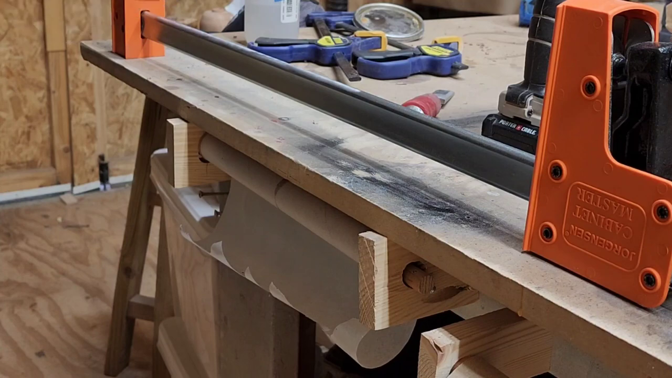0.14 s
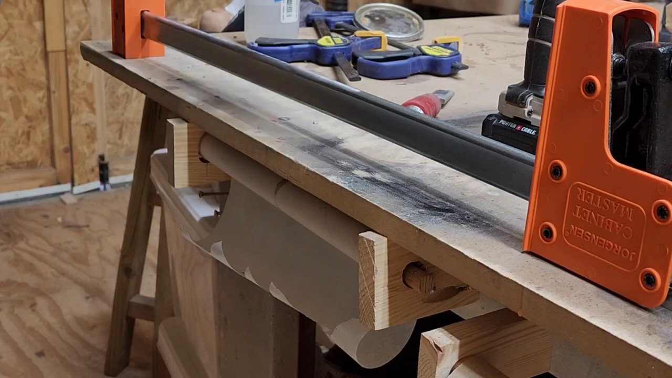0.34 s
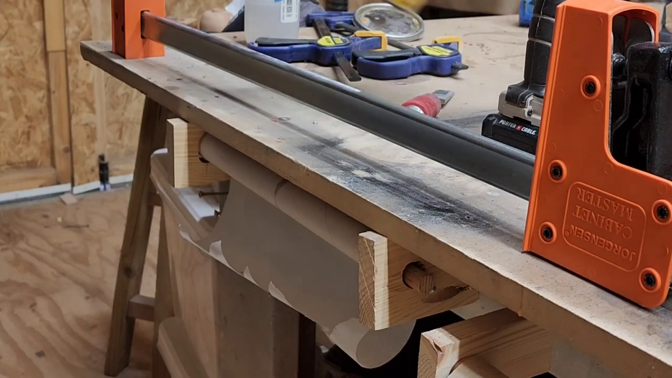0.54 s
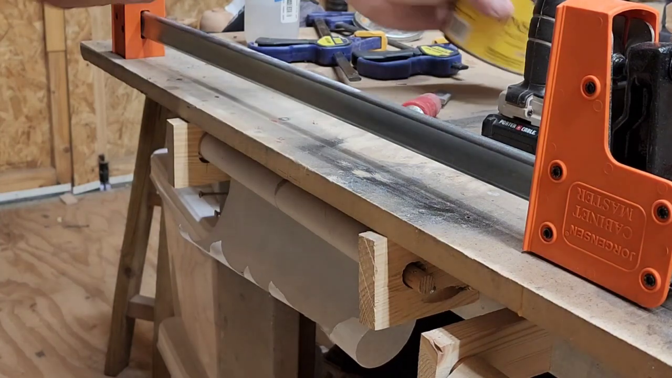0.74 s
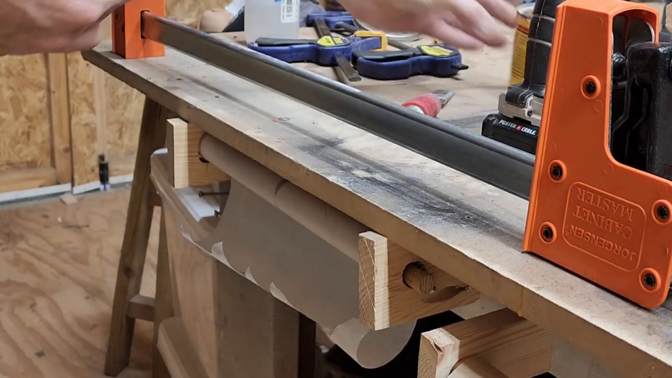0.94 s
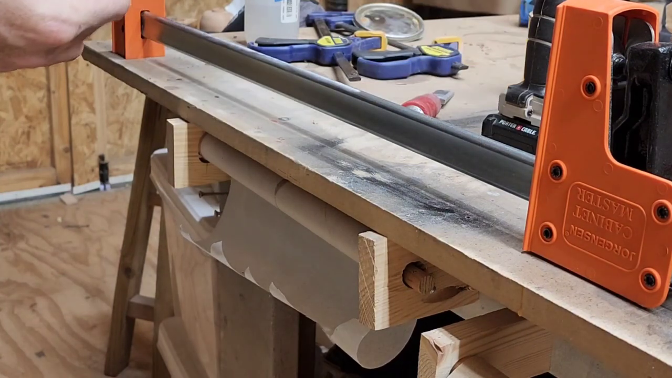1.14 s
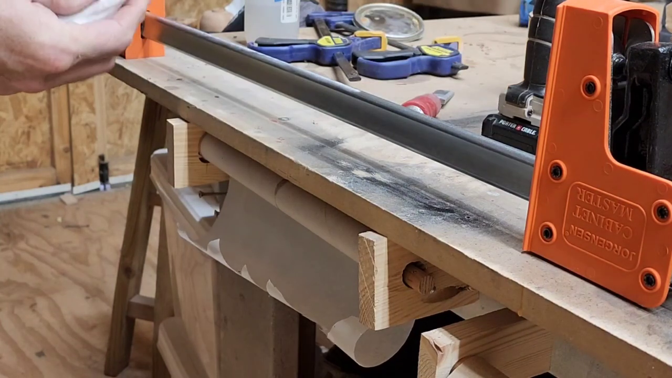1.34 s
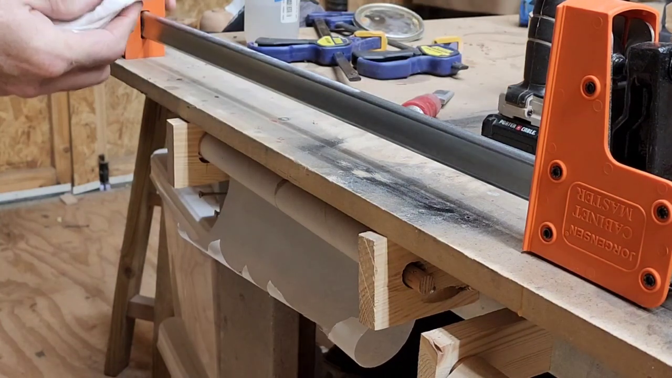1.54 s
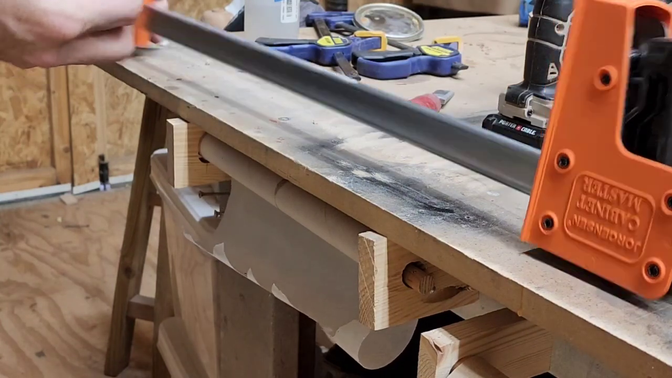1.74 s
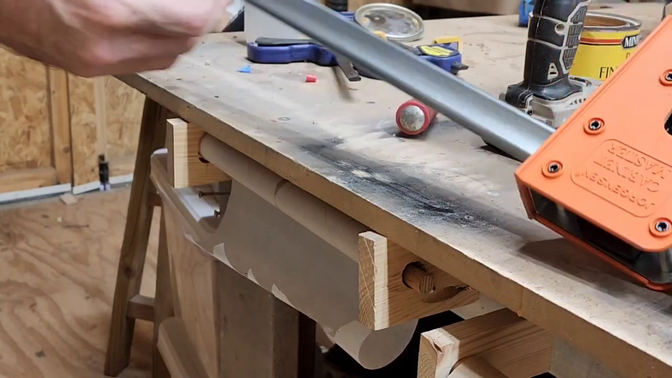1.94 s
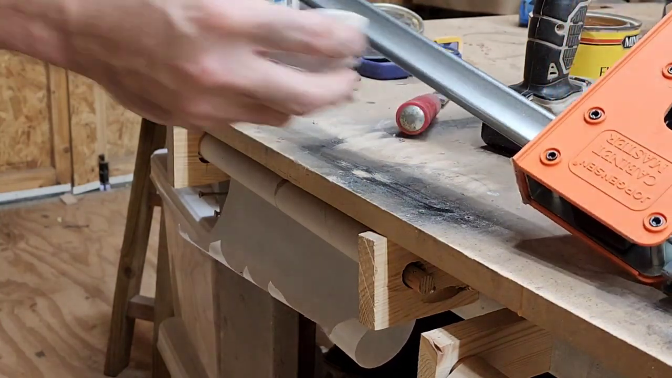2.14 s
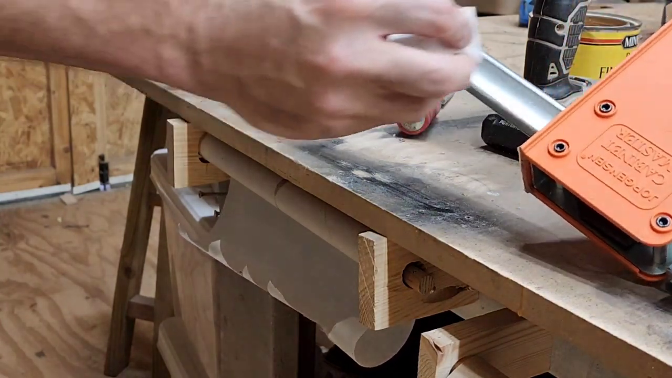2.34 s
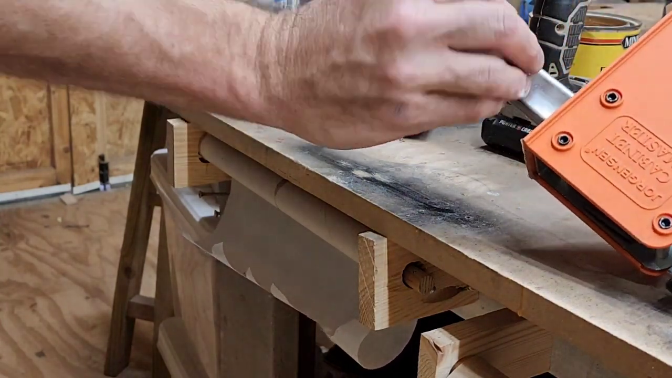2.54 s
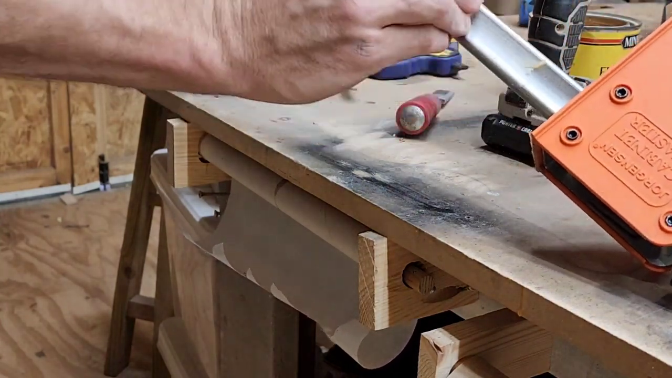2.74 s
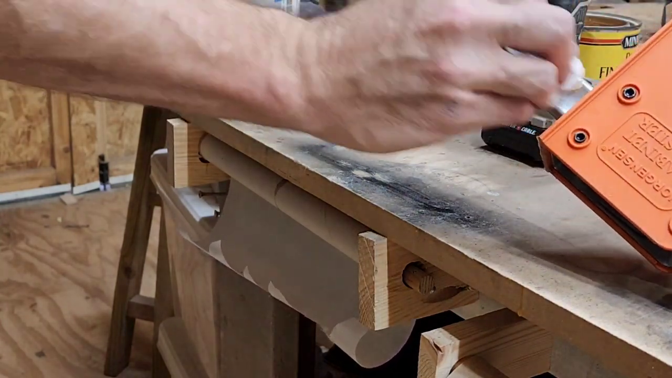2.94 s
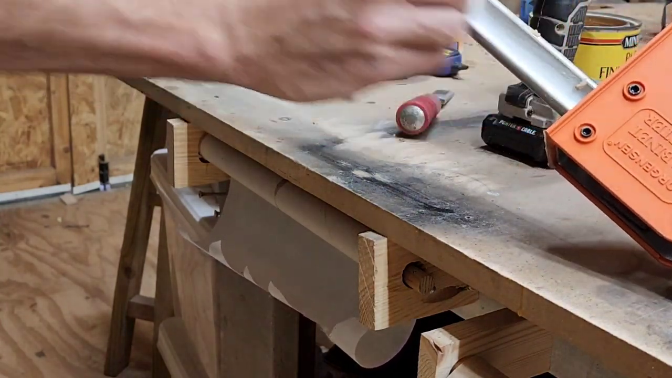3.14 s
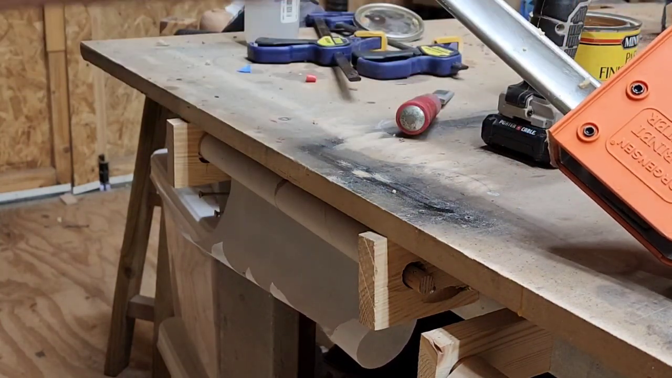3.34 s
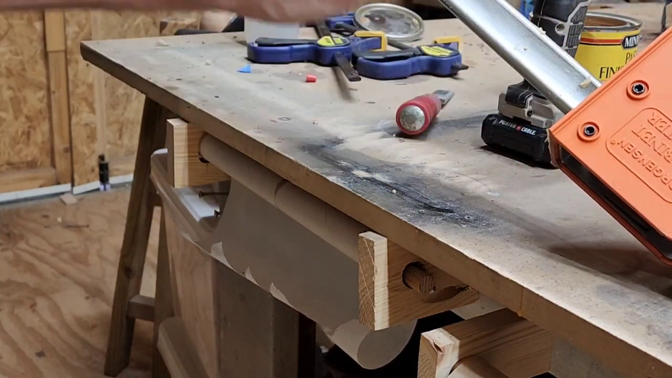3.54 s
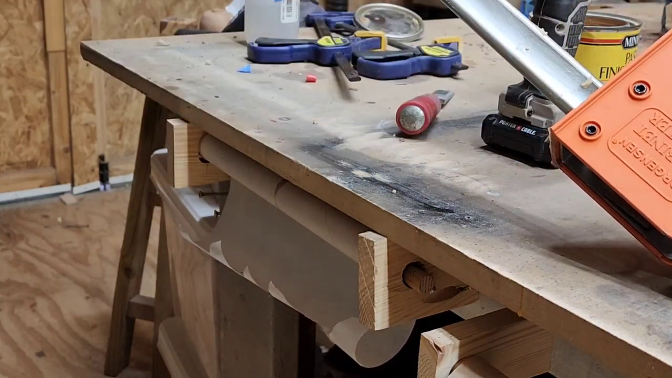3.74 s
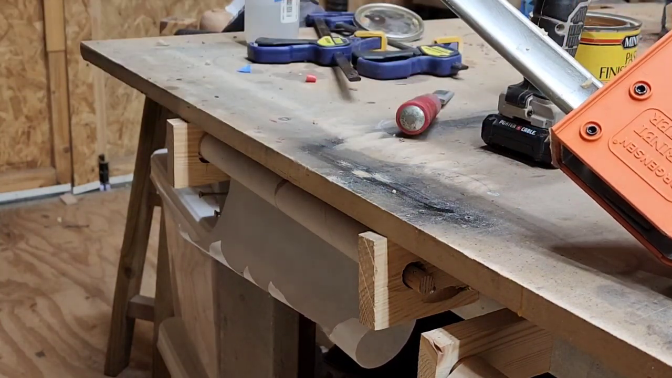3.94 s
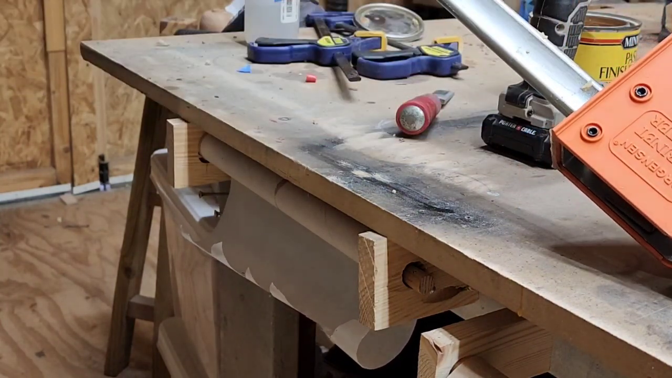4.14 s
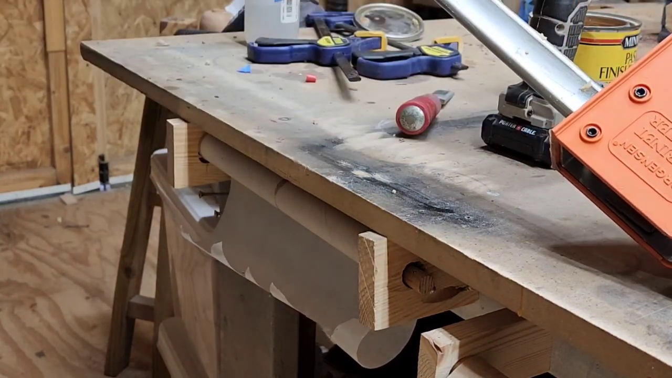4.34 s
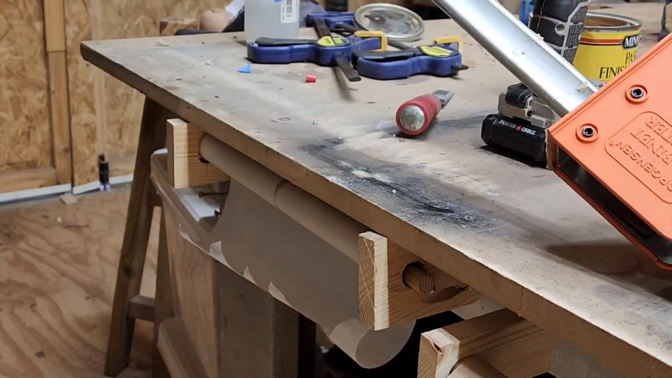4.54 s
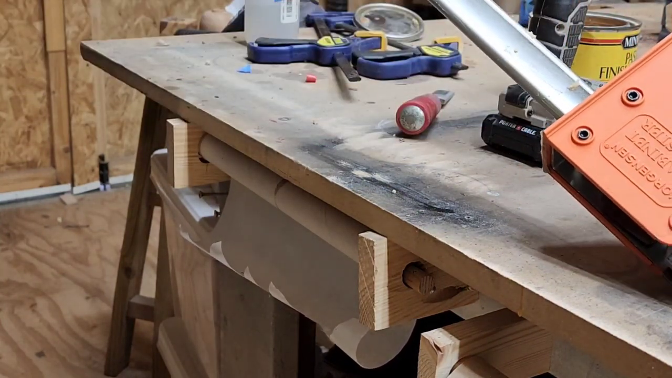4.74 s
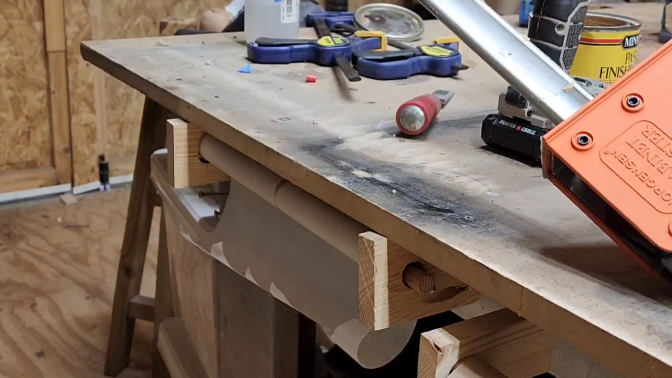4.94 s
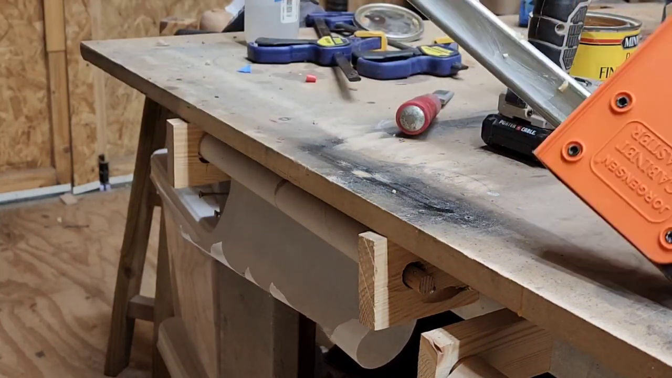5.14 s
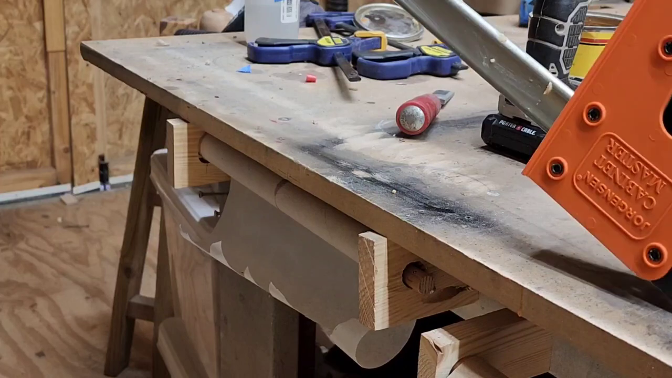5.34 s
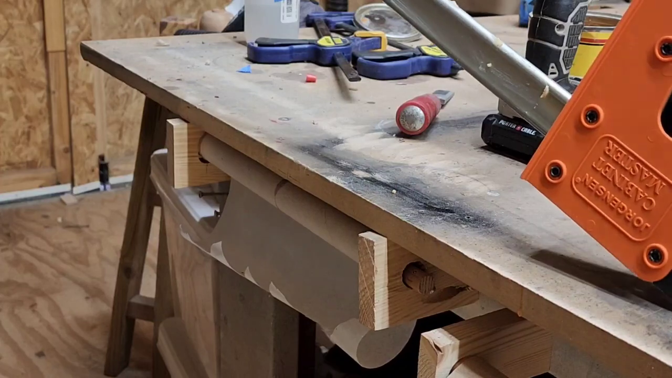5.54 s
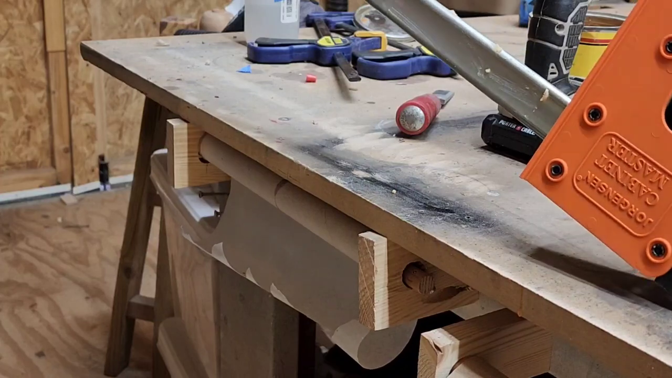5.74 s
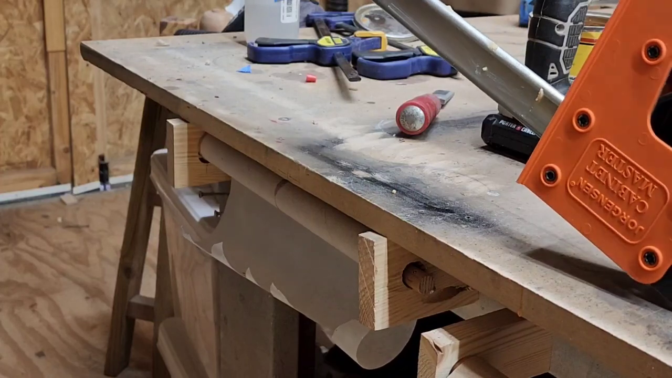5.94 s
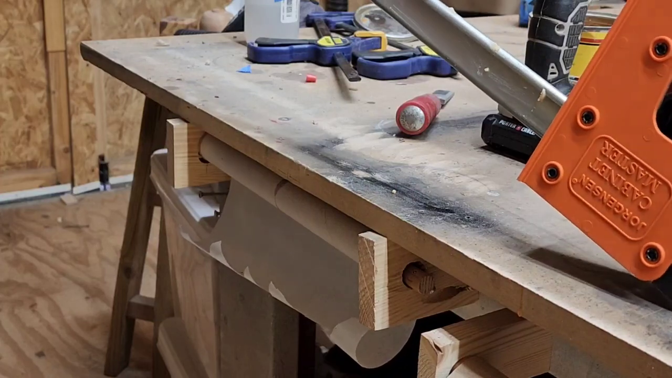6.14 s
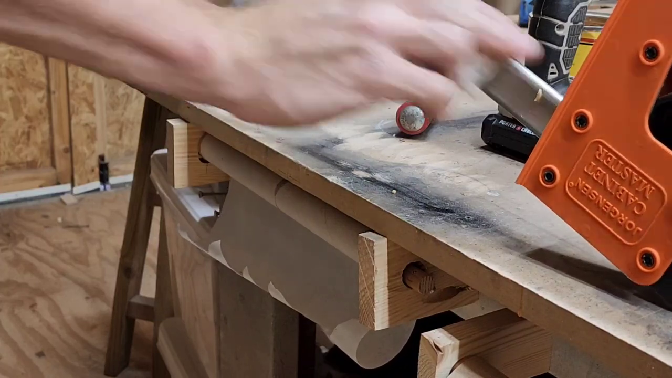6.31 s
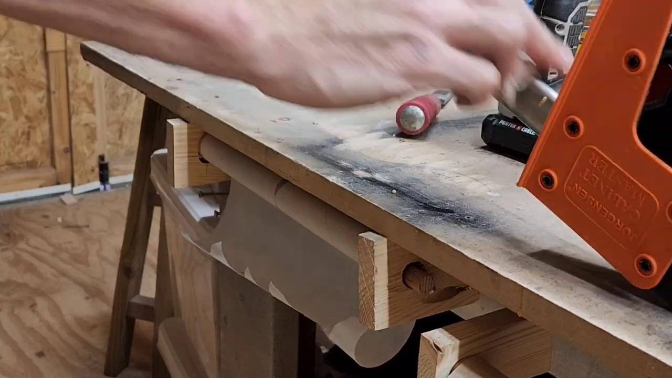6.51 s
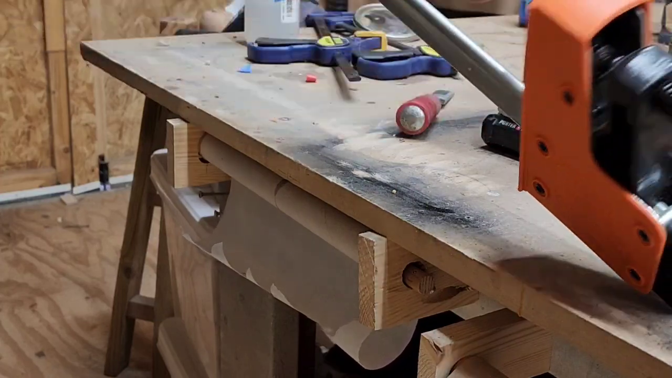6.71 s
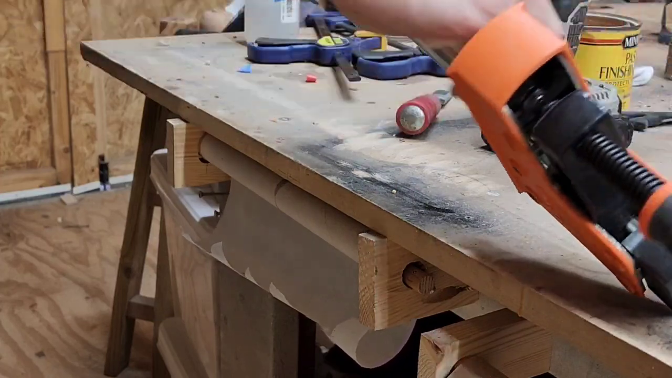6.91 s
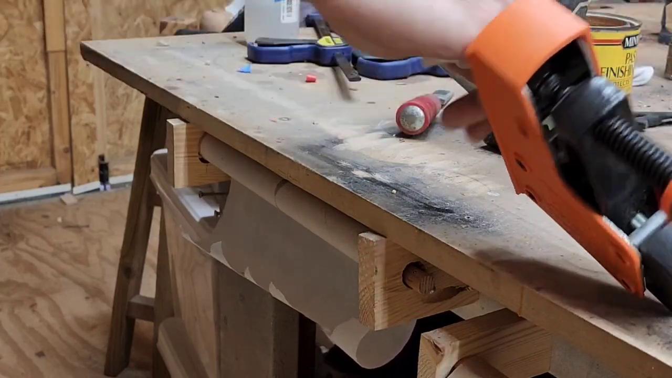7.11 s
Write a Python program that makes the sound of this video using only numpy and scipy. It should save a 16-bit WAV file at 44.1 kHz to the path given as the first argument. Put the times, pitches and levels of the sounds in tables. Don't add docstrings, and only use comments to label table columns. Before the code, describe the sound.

A tin knocks down twice on a wooden bench, a clamp's plastic jaw chatters down its steel bar, then a rag wipes it amid small clacks.

```python
import sys
import numpy as np
from scipy import signal
from scipy.fft import rfft, irfft, next_fast_len
from scipy.io import wavfile
from scipy.ndimage import uniform_filter1d

SR = 44100
rng = np.random.default_rng(int(sys.argv[2]) if len(sys.argv) > 2 else 0)


def transcribe(signal):
    frames = np.atleast_2d(signal).T
    limited = np.clip(frames, -1, 1)
    pcm = np.round(limited * 32767).astype(np.int16)
    wavfile.write(sys.argv[1], SR, pcm)


def makeup_ratio(level_db):
    decades = np.asarray(level_db, float) / 20
    return 10 ** decades


N = 320607
SIZE = next_fast_len(N + SR)
HZ = np.maximum(np.fft.rfftfreq(SIZE, 1 / SR), 1)
T_S = np.arange(N) / SR
OPPOSITE = np.array([[1], [-1]])


def rms_one(x):
    return x / np.sqrt(np.mean(x ** 2) + 1e-20)


def in_time(rows):
    s, *columns = np.transpose(rows)
    return [np.interp(T_S, s, c) for c in columns]


def at_hz(points, hz):
    f, value = np.array(points).T
    return np.interp(np.log(hz), np.log(f), value)


def drift(rate_hz):
    knots = rng.standard_normal(int(N / SR * 200))
    return np.interp(T_S * rate_hz, np.arange(len(knots)), knots)


def swells(rows):
    return sum(makeup_ratio(db) * np.exp(-((T_S - s) / width_s) ** 2) for s, db, width_s in rows)


# f/Hz, correlation
LIKENESS = [(25, 0.43), (60, 1), (130, 0.95), (290, 0.9), (640, 1), (1410, 0.31), (3100, 0.33),
            (6820, -0.12), (15000, 0.0036)]


def noise(gain):
    mid, side = rfft(rng.standard_normal((2, SIZE)))
    alike = np.clip(at_hz(LIKENESS, HZ), -.99, .99)
    both = np.sqrt(1 + alike) * mid + np.sqrt(1 - alike) * side * OPPOSITE
    return rms_one(irfft(gain * both, SIZE)[:, :N])


def peak(hz, width_hz):
    return 1 / np.hypot(1, 2 * (HZ - hz) / width_hz)


def ring(hz, t60, soft_s, size=9000, order=1):
    t = np.arange(size) / SR
    return np.sin(2 * np.pi * hz * t) * makeup_ratio(-60 * t / t60) * (1 - np.exp(-t / soft_s)) ** order


def burst(white, low_hz, high_hz, rise_s, t60):
    band = signal.butter(1, [low_hz, min(high_hz, .45 * SR)], "band", fs=SR, output="sos")
    t = np.arange(white.shape[-1]) / SR
    grains = rms_one(signal.sosfilt(band, signal.sosfilt(band, white)))
    return grains * (1 - np.exp(-t / rise_s)) * makeup_ratio(-60 * t / t60)


def add(out, s, sound):
    i = round(s * SR)
    out[..., i:i + sound.shape[-1]] += sound[..., :N - i]


def thump(db, modes):
    return sum(makeup_ratio(db + level_db) * ring(hz, t60, 0.0032, size=22000, order=2) for hz, level_db, t60 in modes)


# f/Hz, density/dB
AIR = [(13, -43), (22, -47), (44, -3.5), (75, -14.5), (110, -1), (179, -19), (203, -20.5), (229, -10),
       (265, -22.5), (411, -15), (565, -24), (943, -19), (1120, -24.5), (2160, -27), (7500, -43),
       (9750, -104), (16500, -120)]
# f/Hz, width/Hz, level/dB
AIR_PEAKS = [(57.3, 28, -57), (171.5, 10.6, -60), (400, 120, -63.5), (1000, 43, -64.5), (1500, 140, -65),
             (2200, 170, -69)]
# f/Hz, rms/dB
HUM = [(120.0, -50), (240.0, -65)]
# t/s, level/dB
NUDGES = [(0.273, -32.5), (0.723, -38), (1.6, -61), (2.401, -29), (2.549, -46), (2.981, -50), (3.199, -36),
          (3.42, -60), (3.547, -32.5), (3.852, -59), (4.148, -31.5), (4.36, -33), (4.498, -51),
          (6.617, -32)]
AIR_DB, BENCH_HUM_DB, NUDGE_SWELL_S = -48, -59.5, 0.059
HUM_LAG_S = 15 / 44100


def shop():
    swell_db = .6 * drift(6)
    out = makeup_ratio(AIR_DB + swell_db) * noise(makeup_ratio(at_hz(AIR, HZ)))
    out = out + sum(makeup_ratio(db) * noise(peak(hz, width_hz) ** 2) for hz, width_hz, db in AIR_PEAKS)
    out = out + makeup_ratio(BENCH_HUM_DB) * noise(peak(100.8, 3.0) ** 2)
    out[0] = np.roll(out[0], round(HUM_LAG_S * SR))
    lowest_hz, _, lowest_t60 = BENCH[0]
    for s, db in NUDGES:
        add(out, s, makeup_ratio(db + 3.5) * ring(lowest_hz, lowest_t60, NUDGE_SWELL_S, size=22000))
    t = T_S - np.array([[HUM_LAG_S], [0]])
    return out + sum(makeup_ratio(db) * np.sqrt(2) * np.sin(2 * np.pi * hz * t) for hz, db in HUM)


# start t/s, peak level/dB, place of top speed/0-1, peakedness/1, lower band/dB
STROKES = [(2.68, -64, 0.77, 3, 1.5), (2.92, -63.5, 0.32, 1.5, 2.5), (3.095, -56.5, 0.64, 1.4, 4),
           (3.265, -64.5, 0.15, 1.7, 0.5), (3.40, -56.5, 0.44, 1.2, 4.5), (3.582, -58.5, 0.32, 0.51, 3.5),
           (3.70, -53.5, 0.7, 0.75, 1), (3.875, -54, 0.34, 1.1, 0.5), (3.99, -58, 0.3, 0.75, 0),
           (4.19, -59, 0.52, 1.2, 1.5), (4.345, -57, 0.34, 1.1, 1.5), (4.515, -64.5, 0.4, 1, 1.5),
           (4.655, -65.5, .5, 0.64, 2), (4.805, -65.5, 0.5, 0.67, 1), (4.945, -66.5, 1, 0.25, 4.5),
           (5.06, -65, 0.76, 0.58, 4.5), (5.35, -62.5, 0.58, 0.83, 2.5), (5.51, -63.5, 0.2, 1, 4),
           (5.645, -56, 0.61, 0.62, 2), (6.04, -52.5, 0.55, 1.3, -1), (6.26, -56.5, 0.24, .9, -1),
           (6.61, -80, 0, 6, 4.5), (6.98, -68.5, 0.4, 0.68, 2.5), (7.19, -63, 1, 1.8, 9.5)]
# t/s, level/dB, half width/s
SLEEVES = [
    (0, -82, 0.096),
    (.27, -80.5, 0.046),
    (.93, -88, .04),
    (1.01, -56, 0.01),
    (1.055, -66.5, 0.018),
    (1.08, -73, 0.12),
    (1.66, -93, 0.042),
    (1.78, -72, 0.11),
    (2.39, -74.5, 0.033),
]
LAST_TURN_S, CLOTH_REST_DB = 7.36, -84.5
TURN_BLUR_S = 0.0025
LOW_FOLLOWS, LOW_MATCH_DB = 0.78, -51.5


def strokes():
    level, low_db = np.zeros(N), np.zeros(N)
    ends = [row[0] for row in STROKES[1:]] + [LAST_TURN_S]
    for (s, db, top, power, band_db), end in zip(STROKES, ends):
        now = slice(round(s * SR), round(end * SR))
        top_s = s + np.clip(top, .1, .9) * (end - s)
        phase = np.interp(T_S[now], [s, top_s, end], [0, np.pi / 2, np.pi])
        level[now] = makeup_ratio(db) * np.abs(np.sin(phase)) ** max(power, .2)
        low_db[now] = band_db
    level = uniform_filter1d(level, size=round(TURN_BLUR_S * SR))
    level_db = 20 * np.log10(level + makeup_ratio(CLOTH_REST_DB) + swells(SLEEVES))
    return level_db, uniform_filter1d(low_db, size=1000) + (LOW_FOLLOWS - 1) * (level_db - LOW_MATCH_DB)


# f/Hz, density/dB
WIPE_LOW = [(1500, -6), (3000, -9.5), (4500, -9.5), (6000, -5), (7500, -1), (9000, -5.5), (10500, -6),
            (12000, -3.5)]
# f/Hz, density/dB
WIPE_HIGH = [(7000, -23), (9000, -27), (11000, -2), (13000, 4.5), (14500, 1.5), (15700, -3), (16300, 7)]
# t/s, peak level/dB
TICKS = [
    (0.2907, -56),
    (0.8215, -55),
]
QUIET_TOP_HZ = 15740


def rag():
    level_db, low_db = strokes()
    high = makeup_ratio(0.62 * drift(52)) * noise(makeup_ratio(at_hz(WIPE_HIGH, HZ)) * (HZ < QUIET_TOP_HZ))
    low = makeup_ratio(low_db - 1.0 + drift(34)) * noise(makeup_ratio(at_hz(WIPE_LOW, HZ))) * makeup_ratio(2.5 * OPPOSITE)
    out = makeup_ratio(level_db + 5.0) * (high + low)
    for s, db in TICKS:
        add(out, s, makeup_ratio(db) * (ring(14000, .012, .0002) + ring(15000, .012, .0002)))
    return out


def strike(modes, luck, spread_db, apart_db, soft_s):
    out = 0
    for (hz, db, t60), (a, b) in zip(modes, luck):
        apart = b * min(hz / 1500, 1)
        out = out + makeup_ratio(db + spread_db * a + apart_db * apart * OPPOSITE) * ring(hz, t60, soft_s)
    return out


# t/s, peak level/dB, contact brightness f/Hz, rattle/dB, bench thump/dB
TIN_HITS = [(1.0015, -13, 2000, -5.5, -28), (1.0062, -2.5, 2400, -10, -11.5),
            (1.0109, -6.5, 2660, -13.5, -8.5), (1.0145, -14, 1790, -8, -27.5), (1.023, -9.5, 1440, -8, -11),
            (1.030, -16.5, 2640, -15, -21), (1.04, -10.5, 1510, -13.5, -35), (1.056, -14, 1600, -5, -11.5),
            (1.137, -26.5, 955, -1, -37), (1.190, -12.5, 1130, -6.5, -26), (1.193, -2, 2180, -21, -34.5),
            (1.198, -9, 2960, -36, -22.5), (1.206, -4.5, 1000, -27, -23), (1.2132, -23, 1000, -12, -7.5),
            (1.227, -21, 900, -7, -31)]
# f/Hz, level/dB, t60/s
TIN_FIRST = [(298, -4, 0.097), (379, -10.5, 0.14), (624, -2, 0.047), (705.4, 0.5, 0.078), (835, -6.5, 0.05),
             (910, -12.5, 0.056), (1080, -10, 0.042), (1470, 0, 0.063), (1703, -6, 0.04), (1960, -10, 0.02),
             (2300, -8, 0.027)]
# f/Hz, level/dB, t60/s
TIN_SECOND = [(299, -20, 0.14), (375, -5.5, 0.047), (516.5, -5, 0.099), (657, -4, 0.057),
              (730, -3.5, 0.057), (1160, -7, 0.041), (1380, -11.5, 0.023), (1530, -2, 0.052),
              (2000, 3, 0.01), (2180, -2, 0.033), (3230, 0, 0.019)]
# f/Hz, level/dB, t60/s
BENCH = [(100.9, 0, 0.34), (131, -19, 0.15), (170.2, -17, 0.3), (223.5, -7, 0.26), (285, -16, 0.25),
         (372, -21, 0.2), (497, -21, 0.1)]
# t/s, level/dB, f/Hz
KNOCKS = [
    (1.0061, 6, 1100),
    (1.0109, 0, 1500),
    (1.1902, -9, 800),
    (1.1933, 5.7, 1150),
    (1.1977, 2, 1400),
]
# t/s, f/Hz, level/dB, t60/s, swell/s
TIN_BODY = [
    (1.016, 190, -12, 0.09, 0.02),
    (1.0065, 712, -11.5, 0.1, 0.0028),
    (1.0065, 1700, -25.5, .04, 0.0015),
    (1.191, 710, -11, 0.029, 0.00067),
    (1, 160, -26, 0.063, 0.0057),
    (1.134, 772, -9, 0.04, 0.0099),
    (1.152, 360, -14.5, 0.032, 0.0035),
]
# t/s, level/dB, t60/s
GRIT = [
    (1.005, -34, 0.29),
    (1.191, -38, 0.11),
]
# t/s, level/dB
TIN_SKID = [(0.975, -91), (0.988, -45.5), (0.998, -30), (1.004, -49), (1.012, -69)]
KNOCK_T60_S = .003


def tin():
    out, low = np.zeros((2, N)), np.zeros(N)
    luck = rng.standard_normal((len(TIN_HITS), 11, 2))
    whites = rng.standard_normal((len(TIN_HITS), 2, 9000))
    for (s, db, soft_hz, rattle_db, thump_db), chance, white in zip(TIN_HITS, luck, whites):
        landing = TIN_FIRST if s < 1.1 else TIN_SECOND
        modes = [(hz, level - 10 * np.log10(1 + (hz / soft_hz) ** 4), t60) for hz, level, t60 in landing]
        white = .6 * white[0] + .8 * white
        rattle = burst(white, 513, soft_hz, 0.0011, 0.068) + makeup_ratio(-13) * burst(white, 120, 480, 0.017, 0.22)
        blow = strike(modes, chance, spread_db=3.0, apart_db=9.5, soft_s=0.0014)
        add(out, s, makeup_ratio(db) * (makeup_ratio(-15.5) * blow + makeup_ratio(rattle_db) * rattle))
        add(low, s, thump(db + thump_db, BENCH))
    for s, db, hz in KNOCKS:
        add(out, s, -makeup_ratio(db) * ring(hz, KNOCK_T60_S, 1 / 5000))
    for s, hz, db, t60, swell_s in TIN_BODY:
        add(out, s, makeup_ratio(db) * ring(hz, t60, swell_s, size=15000))
    out = signal.sosfilt(signal.butter(3, 2500, fs=SR, output="sos"), out)
    for (s, db, t60), white in zip(GRIT, whites):
        add(out, s, makeup_ratio(db) * burst(white[::-1], 1700, 4130, 0.0017, t60))
    return out + makeup_ratio(in_time(TIN_SKID)[0]) * noise(peak(1100, 300) + peak(1920, 150)), low


# t/s, level/dB
SLIDE = [(1.9, -80), (1.95, -44.5), (1.98, -46.5), (1.988, -30), (2.025, -26), (2.07, -30.5), (2.10, -41.5),
         (2.16, -60.5), (2.2, -93)]
# f/Hz, density/dB
SLIDE_COLOUR = [(200, 8.5), (450, -7.5), (800, -6.5), (1350, -0.5), (2100, -2.5), (4200, -10), (7000, -8.5),
                (9000, -13), (13000, -9), (16000, -17)]
# t/s, dip/dB, half width/s
SKIPS = [
    (2.007, -10, 0.0036),
    (2.030, -8, 0.002),
    (2.0427, -3, .0015),
    (2.0566, -16, 0.0018),
    (2.072, -8, .002),
]
# t/s, level/dB, half width/s
RUSTLES = [
    (5.3, -56.5, .02),
    (4.865, -54, .04),
    (5.21, -46, .015),
    (7.255, -50.5, 0.013),
    (1.7, -60.5, .03),
]


def slide():
    level_db, = in_time(SLIDE)
    chatter_db = 4 * drift(180)
    chatter_db = chatter_db + sum(db * np.exp(-((T_S - s) / width_s) ** 2) for s, db, width_s in SKIPS)
    scrape = makeup_ratio(level_db + chatter_db) * noise(makeup_ratio(at_hz(SLIDE_COLOUR, HZ)))
    return scrape + swells(RUSTLES) * noise(peak(1430, 400) + 0.23 * peak(2300, 900))


# t/s, peak level/dB, bar/dB, bar f/Hz, sizzle/dB
CLICKS = [(1.791, -59, 13, 5000, -25), (1.795, -52.5, 10, 4500, -27), (1.9442, -58.5, 20.5, 3770, -22),
          (5.071, -46, 10, 4030, -27), (5.1867, -41.5, 9, 3800, 2.5), (5.208, -56, 17.5, 4230, -7),
          (5.2211, -26, 0, 2300, -2.5), (5.229, -54, 17, 4640, -11), (5.238, -54, 11, 3010, -18.5),
          (5.8833, -32.5, 1, 3280, -10.5), (6.8342, -40, 2, 2280, -14), (6.9596, -44, 17, 4250, -5),
          (6.9594, -38, 16, 2880, 7), (6.968, -46, -3, 2900, 0), (6.988, -49, 11, 2850, -14.5),
          (7.0507, -59.5, 22, 4950, 2), (7.0512, -52.5, 17.5, 2990, -12), (7.253, -60.5, 20, 3000, -16)]
# t/s, peak level/dB, jaw f/Hz, bar/dB, bar f/Hz
LIFT = [
    (1.8287, -17.5, 1360, -12, 2900),
    (1.8343, -18, 1320, -22, 2980),
    (1.848, -29, 1370, -12, 3080),
    (1.8508, -34, 1420, -15, 3400),
]
# t/s, peak level/dB, jaw f/Hz, bar/dB, bar f/Hz
CHATTER = [(1.9838, -23, 1380, -2, 2000), (1.9887, -29, 1340, 0.5, 3000), (1.993, -13, 1380, -7, 2400),
           (1.995, -29, 1390, 6, 6600), (1.9953, -21, 1350, 1.5, 3670), (1.997, -24, 1350, -19, 2200),
           (2.0013, -26, 1300, 6.5, 3550), (2.0114, -19, 1380, -1.5, 1970), (2.0127, -11, 1420, -8, 2930),
           (2.0145, -29.5, 1410, 12.5, 5000), (2.017, -26.5, 1370, 5.5, 2150),
           (2.0223, -17, 1350, -4, 2030), (2.025, -16.5, 1420, -8, 2080), (2.0275, -32, 1350, 5.5, 3800),
           (2.034, -25, 1330, -12, 5520), (2.0375, -26, 1320, 11.5, 5350), (2.039, -26.5, 1430, 9.5, 2070),
           (2.0438, -6, 1360, -10, 4370), (2.0463, -31, 1380, 12.5, 4260), (2.047, -19, 1380, 2, 2900),
           (2.0506, -17.5, 1390, -8, 2140), (2.0536, -17, 1350, -20, 3000),
           (2.0615, -20.5, 1390, 3.5, 2200), (2.064, -33, 1410, 11, 3530),
           (2.0659, -15.5, 1330, -14.5, 2970), (2.0752, -30.5, 1350, 5, 2060), (2.087, -35, 1300, -9, 3930),
           (2.091, -39, 1330, -7, 2050)]
# t/s, peak level/dB, jaw f/Hz, bar/dB, bar f/Hz
ROCKS = [(4.2624, -32, 1350, -40, 2300), (5.079, -21, 1420, -9, 2280), (5.093, -21.5, 1410, -11, 3930),
         (5.104, -40, 1380, 2, 2400), (5.4588, -27.5, 1340, -14, 3500), (5.4906, -23, 1380, -23, 4330),
         (5.494, -25.5, 1420, -12, 2680), (5.5682, -14, 1430, -17, 4200), (5.585, -27, 1340, -5.5, 3500),
         (5.589, -25, 1320, -24, 3630), (5.7411, -23, 1380, -20, 3840), (5.761, -34, 1230, -15, 3770),
         (5.8891, -24.5, 1180, -5.5, 2370), (5.892, -38, 1420, 5, 3000), (6.025, -37, 1450, -8.5, 2410),
         (6.048, -27, 1310, -22, 2700), (6.0621, -33, 1370, -10, 4150), (6.064, -28, 1390, -14, 3080),
         (6.254, -38, 1410, -10, 2600), (6.2803, -29.5, 1305, -3, 3500), (6.5569, -18, 1320, -26, 3900),
         (6.5604, -30, 1230, 1, 3770), (6.8359, -30, 1530, -2, 3640), (6.837, -38.5, 1440, 6.5, 3060)]
# t/s, peak level/dB, jaw f/Hz
SETTLES = [(1.838, -39.5, 1250), (1.85, -28, 1350), (1.859, -44, 1350), (1.865, -49.5, 1340),
           (4.266, -48, 1370), (4.27, -45, 1210), (4.79, -43, 1400), (4.849, -49, 1470), (4.884, -44, 1310),
           (5.0745, -31, 1420), (5.081, -36, 1420), (5.114, -43, 1400), (5.3358, -39.5, 1440),
           (5.463, -32, 1460), (5.4835, -28, 1390), (5.4875, -44, 1350), (5.5, -38, 1410),
           (5.5646, -29, 1220), (5.5739, -27, 1570), (5.579, -34, 1490), (5.594, -39, 1330),
           (5.737, -40, 1390), (5.746, -31.5, 1520), (5.7662, -37, 1310), (5.792, -44, 1400),
           (5.876, -38, 1340), (5.894, -30, 1360), (6.034, -41, 1350), (6.054, -43, 1410),
           (6.0712, -38.5, 1450), (6.266, -36.5, 1340), (6.2843, -26, 1440), (6.292, -36, 1470),
           (6.301, -42.5, 1380), (6.5625, -26, 1520), (6.5662, -39, 1460), (6.568, -43, 1290),
           (6.583, -33, 1380), (6.828, -33, 1470), (6.844, -42, 1550), (6.846, -27, 1440),
           (6.854, -40, 1470), (6.9648, -38, 1470)]
LIFT_SIZZLE_DB, CHATTER_SIZZLE_DB, ROCK_SIZZLE_DB = -20.5, -13, -32.5
SETTLE_BAR_DB, ROCK_BAR_HZ, CLICK_JAW_HZ = -16, 2280, 1440
CLICK_QUICKNESS = .45


def contacts():
    lift = [(*row, LIFT_SIZZLE_DB, 1) for row in LIFT]
    chatter = [(*row, CHATTER_SIZZLE_DB, 1) for row in CHATTER]
    rocks = [(*row, ROCK_SIZZLE_DB, 1) for row in ROCKS]
    settles = [(*row, SETTLE_BAR_DB, ROCK_BAR_HZ, ROCK_SIZZLE_DB, 1) for row in SETTLES]
    clicks = [(s, db, CLICK_JAW_HZ, *rest, CLICK_QUICKNESS) for s, db, *rest in CLICKS]
    return sorted(lift + chatter + rocks + settles + clicks)


# t/s, level/dB
THUMPS = [(1.848, -32.5), (1.9972, -21.5), (2.0066, -19.5), (2.027, -16), (2.038, -20.5), (2.056, -17),
          (4.261, -34.5), (5.08, -29), (5.483, -33.5), (5.589, -29), (5.889, -37), (6.051, -34.5),
          (6.28, -40), (6.557, -36.5), (6.821, -33.5), (6.86, -31), (7.051, -35)]
# f/Hz, level/dB, t60/s
BENCH_HELD = [(101.5, -3, 0.37), (130, -14, 0.14), (172, -14.5, 0.21), (223, -8.5, 0.12),
              (284, -16.5, 0.17), (368.5, -16.5, 0.13), (492, -21.5, 0.094)]
# t/s, f/Hz, level/dB, t60/s, swell/s
BOARDS = [
    (2.035, 222, -16, 0.086, 0.0076),
    (2.4, 374, -26, 0.022, 0.0068),
    (2.074, 378, -21, 0.055, 0.0035),
    (3.545, 250, -36.5, 0.102, .008),
]
LEFT_LAG_S = 3 / 44100


def jaw():
    out, low = np.zeros((2, N)), np.zeros(N)
    whites = rng.standard_normal((len(contacts()), 3, 3000))
    for (s, db, hz, bar_db, bar_hz, sizzle_db, quick), white in zip(contacts(), whites):
        white = 0.65 * white[0] + 0.74 * white[1:]
        hollow = makeup_ratio(5.5) * ring(hz, 0.01, quick * 0.001, size=3000, order=4)
        hollow = hollow + makeup_ratio(-17.5) * burst(white, 1320, 1470, 0.0051, 0.034)
        hollow = hollow + makeup_ratio(-19.5) * burst(white, 610, 2550, quick * 0.001, 0.044)
        bar = makeup_ratio(3) * ring(bar_hz, 0.0078, 0.00056, size=3000, order=2)
        bar = bar + makeup_ratio(-14.0) * ring(4240, 0.016, 0.0013, size=3000)
        bar = bar + makeup_ratio(-7.5) * burst(white, bar_hz * 0.69, bar_hz * 1.9, quick * 0.0015, 0.0083)
        bar = bar + makeup_ratio(-16) * burst(white, 1700, 4500, 0.0016, 0.047)
        sizzle = makeup_ratio(1.0) * burst(white, 11230, 14700, 0.00058, 0.027) * OPPOSITE
        sizzle = sizzle + makeup_ratio(13.0) * ring(8470, 0.0031, 0.00033, size=3000) * np.array([[1], [-.3]])
        sizzle = sizzle + makeup_ratio(-4.5) * burst(white, 4700, 6200, 0.00046, 0.0061)
        add(out, s - .0008, makeup_ratio(db + 7.0) * (hollow + makeup_ratio(bar_db) * bar + makeup_ratio(sizzle_db) * sizzle))
    for s, db in THUMPS:
        add(low, s, thump(db, BENCH_HELD))
    for s, hz, db, t60, swell_s in BOARDS:
        add(low, s, makeup_ratio(db) * ring(hz, t60, swell_s))
    out[0] = np.roll(out[0], round(LEFT_LAG_S * SR))
    return out * makeup_ratio(.3 * OPPOSITE), low


# f/Hz, t60/s
ROOM = [(150, 0.47), (600, 0.18), (1500, 0.15), (3500, 0.23), (8000, 0.024)]


def room(x):
    t = np.arange(SR // 2) / SR
    echo = 0
    for hz, t60 in ROOM:
        band = signal.butter(1, [hz / 1.86, hz * 1.76], "band", fs=SR, output="sos")
        common, *own = rng.standard_normal((3, len(t)))
        share = 1 / (1 + (hz / 800) ** 2)
        white = np.sqrt(share) * common + np.sqrt(1 - share) * np.array(own)
        echo = echo + signal.sosfilt(band, white) * makeup_ratio(-60 * t / t60)
    echo = echo * (1 - np.exp(-t / 0.011))
    echo = echo / np.sqrt(np.sum(echo ** 2) / 2)
    return irfft(rfft(x.mean(axis=0), SIZE) * rfft(echo, SIZE), SIZE)[:, :N]


def scene():
    (far, far_low), (near, near_low) = tin(), jaw()
    near = near + slide()
    high_pass = signal.butter(2, 45, "high", fs=SR, output="sos")
    bench = signal.sosfilt(high_pass, far_low + near_low) * makeup_ratio(-1.2 * OPPOSITE)
    bench_note = None
    sent = makeup_ratio(-11.5) * far + makeup_ratio(-19) * near + makeup_ratio(-24) * bench
    return far + near + bench + room(sent) + rag() + shop()


def top_cut(x):
    return signal.sosfilt(signal.butter(12, 15950, fs=SR, output="sos"), x)


# f/Hz, gain/dB
MIC = [(6500, 1.5), (7700, -2.5), (8250, -13.5), (8700, -13), (9100, -8.5), (9700, -9), (11000, -5.5),
       (13000, -7)]
# f/Hz, difference/dB
BALANCE_DB = [(60, .3), (250, .3), (1000, .5), (2500, 2), (5000, 4), (8000, 0), (12000, -2.5)]
TOP_HZ = 15950


def record(dry):
    colour = makeup_ratio(at_hz(MIC, HZ) + at_hz(BALANCE_DB, HZ) / 2 * OPPOSITE)
    x = irfft(rfft(dry, SIZE) * colour * (HZ < TOP_HZ), SIZE)[:, :N]
    return top_cut(2 * np.tanh(x / 2))


dry = scene()
out = record(dry)
transcribe(out)
```